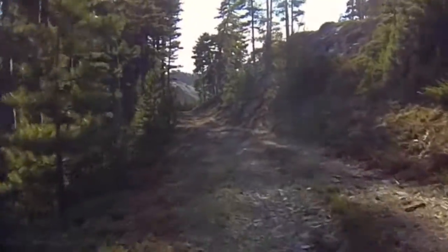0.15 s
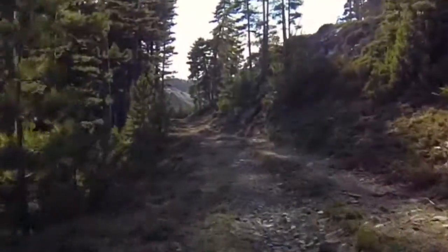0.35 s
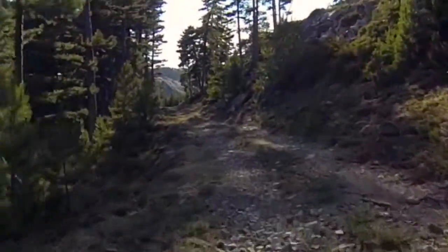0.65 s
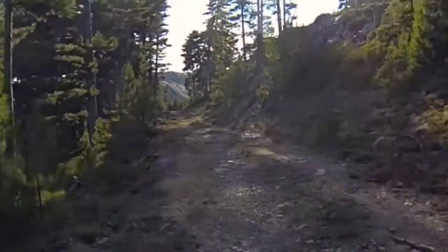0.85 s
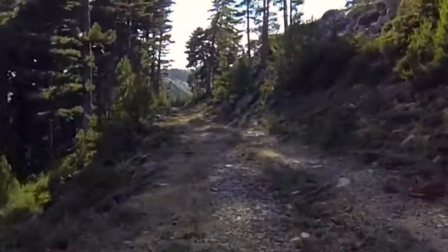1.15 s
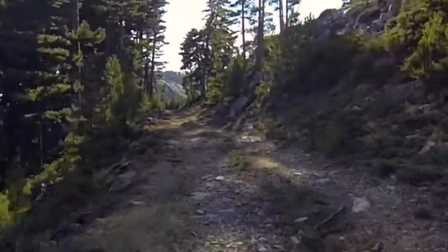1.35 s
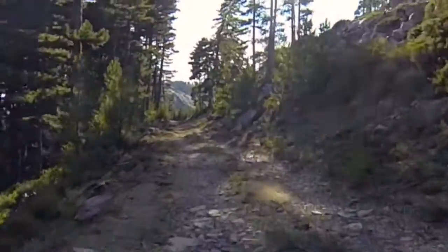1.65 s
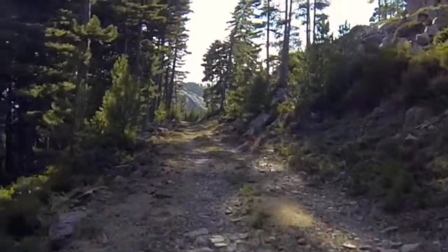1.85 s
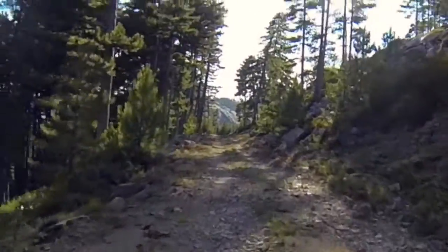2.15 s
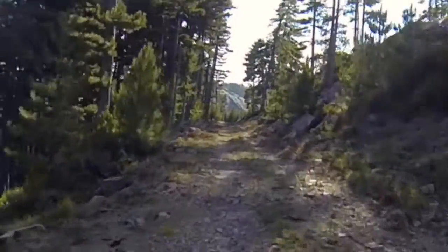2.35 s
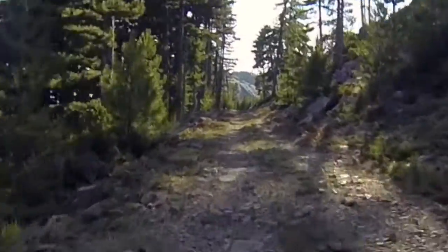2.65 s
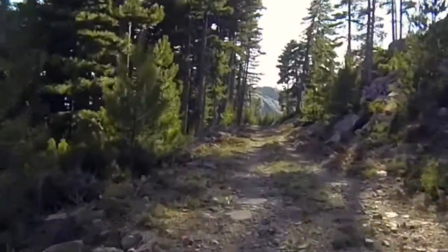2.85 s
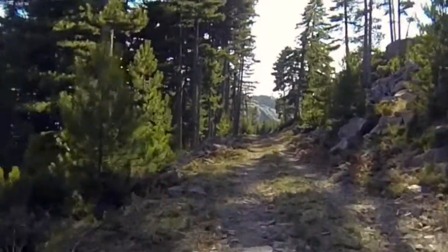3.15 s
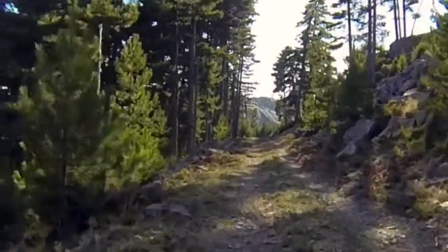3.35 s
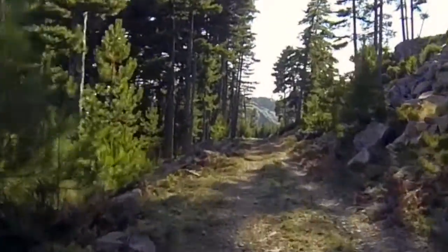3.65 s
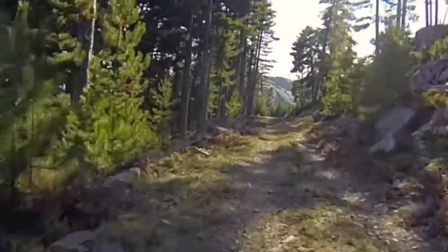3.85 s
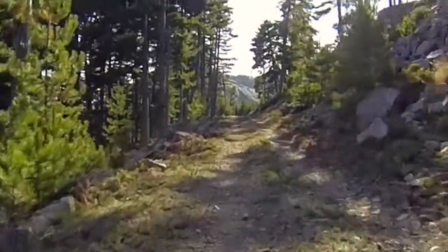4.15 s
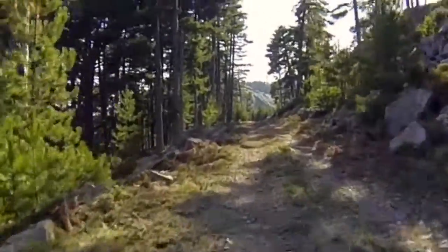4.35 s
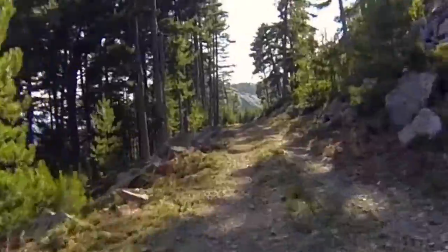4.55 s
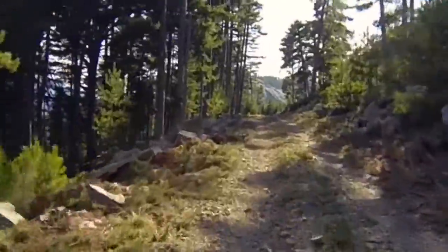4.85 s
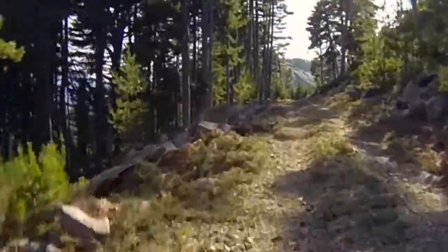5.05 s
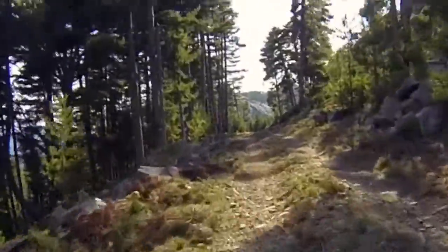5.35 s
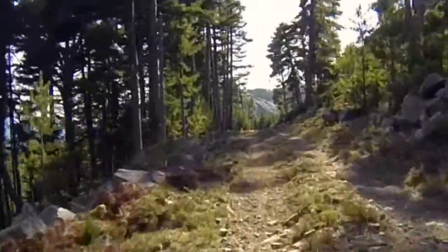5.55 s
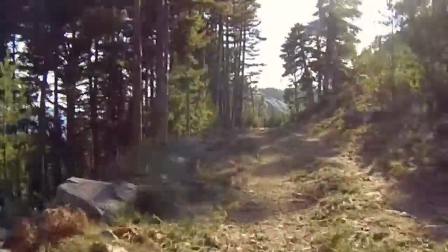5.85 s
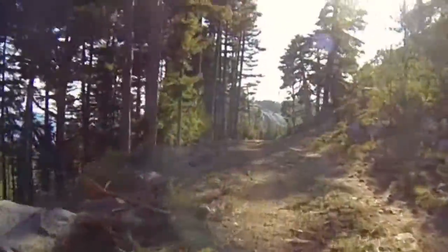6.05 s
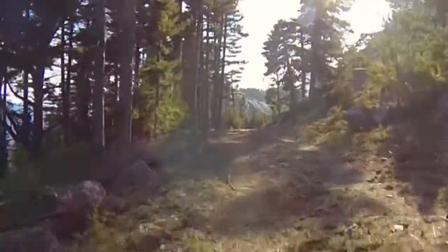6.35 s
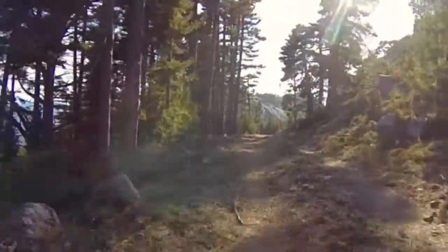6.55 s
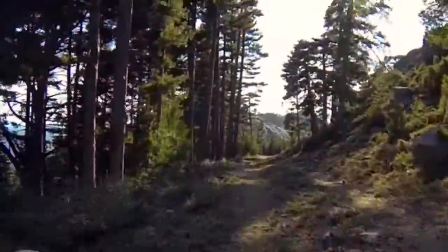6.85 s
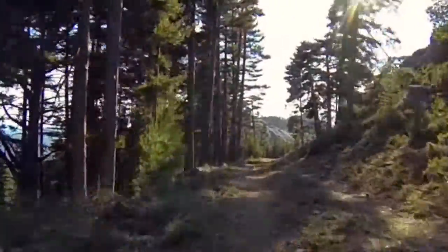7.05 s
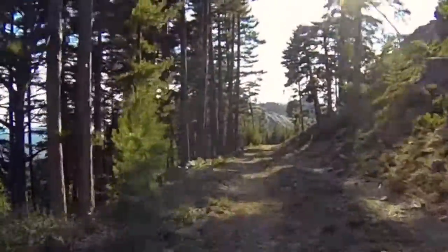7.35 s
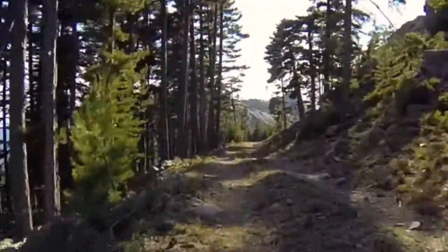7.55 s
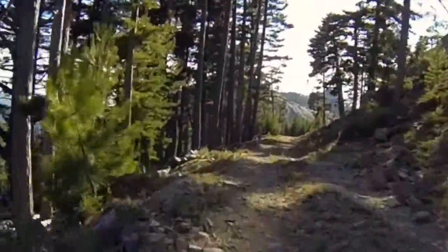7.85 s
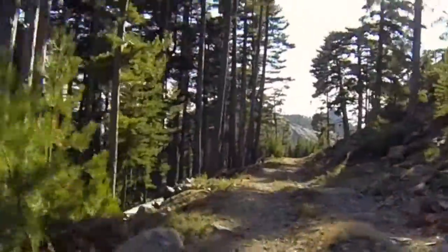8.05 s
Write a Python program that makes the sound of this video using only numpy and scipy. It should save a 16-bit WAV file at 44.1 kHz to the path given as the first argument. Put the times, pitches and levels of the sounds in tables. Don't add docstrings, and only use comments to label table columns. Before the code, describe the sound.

Close on a bike frame, tyres crunch loose stones amid deep wind rumble, boxy knocks and rattles, with flung stones pinging off the tubes.

```python
import sys
import numpy as np
from scipy import signal
from scipy.fft import rfft, irfft
from scipy.io import wavfile
from scipy.ndimage import uniform_filter1d, minimum_filter1d

SR = 44100
rng = np.random.default_rng(int(sys.argv[2]) if len(sys.argv) > 2 else 0)


def waveform_to_disk(signal):
    frames = np.transpose(np.atleast_2d(signal))
    scaled = np.clip(frames, -1, 1) * 32767
    samples = np.round(scaled).astype(np.int16)
    wavfile.write(sys.argv[1], SR, samples)


def invert_db(x):
    u = np.asarray(x, float) / 20
    return 10 ** u


N = 362040

# frequency in Hz, level in dB per Hz.
BOOM_SPECTRUM = [(7.1, -32), (12, -9), (38, -2.5), (54, 4), (67, -6), (86, -28), (110, -25), (140, -47),
                 (240, -120)]
# frequency in Hz, level in dB per Hz.
BUFFET_SPECTRUM = [(47, -36.5), (80, -3), (92, -3), (135, -4.5), (177, -10.5), (300, -17), (390, -39),
                   (660, -120)]
# time in seconds, boom level in dB.
GUST_CURVE = [(0, -13), (.22, -21.5), (.59, -8.5), (.77, -20.5), (.92, -14), (1.42, -17), (1.55, -10),
              (1.84, -18.5), (2.17, -12), (2.83, -21.5), (3.59, -13), (4.5, -15.5), (5.4, -13),
              (6.48, -13.5), (6.72, -20), (7.15, -5.5), (7.75, -14), (8.1, -13)]
# time in seconds, buffet level in dB.
WIND_CURVE = [(0, -29), (.2, -37), (.5, -25), (.76, -38), (1.0, -31.5), (1.44, -34), (2.05, -30.5),
              (2.4, -30.5), (2.8, -40), (3.3, -38), (3.8, -27.5), (4.5, -32), (5.5, -24.5), (6.1, -28),
              (6.6, -28.5), (7.2, -21.5), (7.75, -22.5), (8.21, -32.5)]
# time in seconds, level in dB.
HISS_CURVE = [(0.0, -23), (0.015, -59), (1.1, -54), (1.32, -72), (2.2, -68), (2.5, -59), (3.06, -71),
              (3.75, -72), (3.9, -48), (4.3, -56), (4.6, -67), (5.3, -69), (6.56, -60), (7.2, -51),
              (8.21, -60)]
# time in seconds, crunch level in dB.
GROUND_CURVE = [(0, -17.5), (.22, -23.5), (.92, -21.5), (1.42, -23.5), (2.15, -19), (2.3, -24), (2.6, -22),
                (2.93, -25.5), (3.4, -23.5), (3.72, -24), (4.0, -18.5), (4.35, -23.5), (5.46, -16),
                (6.0, -21), (6.7, -21), (7.15, -21), (7.72, -20.5), (8.21, -22)]
# frequency in Hz,
# level in dB per Hz.
WALL_SLOPE = [(150, -17), (280, -1.5), (600, -4), (1100, -4), (2200, -9), (3400, -16), (4500, -19.5),
              (6000, -28), (10000, -38), (14900, -48.5), (15500, -103)]
# centre in Hz, width in Hz, height in dB.
HOUSING_PEAKS = [(495, 75, 4), (770, 114, 6.5), (872, 41, 6), (985, 90, 6), (1133, 55, -5.5),
                 (1236, 57, 3.5), (1430, 79, 5.5), (1649, 82, -9.5), (1790, 610, 5), (3117, 96, 7.5),
                 (3530, 460, 3.5), (4810, 620, 4), (6340, 100, -2.5), (6640, 280, 3), (11200, 460, 8)]
SLICE_EDGES_HZ = (150, 420, 640, 1100, 1600, 2700, 4000, 6300, 9500, 16000)
# start in seconds, length in seconds, level in dB.
SKID_EVENTS = [
    (0.405, 0.039, -17.5),
    (1.011, 0.035, -16.5),
    (1.64, 0.036, -14.5),
    (2.42, 0.057, -18),
    (2.958, 0.034, -18),
    (7.922, 0.035, -22.5),
]
# start in seconds, peak in dB, metal tick in dB.
CHAIN_SLAPS = [(0.083, -19, -36), (0.2504, -11, -39), (0.4896, -10, -44), (0.7371, -5.5, -35),
               (0.8228, -10.5, -50), (0.9427, -8.5, -50), (1.2845, -12, -45), (1.6076, -10.5, -50),
               (2.2218, -9.5, -40), (2.514, -5.5, -48), (2.5845, -2.5, -32), (2.7205, -16, -41),
               (2.8725, -18, -42.5), (3.114, -15, -52), (3.1931, -16, -54), (3.3565, -14.5, -51),
               (3.424, -18, -44), (3.5853, -8.5, -45), (3.7328, -12, -39), (3.8552, -8.5, -40),
               (3.896, -12, -55), (3.976, -12.5, -56), (4.34, -13, -53), (4.4157, -5.5, -39),
               (4.4884, -9.5, -48), (4.9257, -11.5, -41), (5.2945, -9, -44), (5.5487, -8.5, -37),
               (5.8718, -20, -55), (6.343, -7.5, -44)]
# start in seconds, peak in dB, favoured pitch in Hz.
MOUNT_RATTLES = [(0.21, -12, 890), (0.406, -14, 824), (0.453, -3, 1440), (0.874, -4, 1240),
                 (1.045, -3.5, 1410), (1.102, -8, 791), (1.317, -6.5, 883), (1.404, -15, 848),
                 (1.504, -10.5, 907), (1.631, -8, 910), (1.738, -8.5, 470), (1.925, -8.5, 888),
                 (2.212, -5.5, 824), (2.81, -8, 1490), (3.531, -4.5, 1480), (3.954, -3.5, 1430),
                 (4.106, -13, 894), (4.238, -9, 970), (4.384, -5.5, 910), (4.841, -6.5, 522),
                 (5.016, -7, 886), (5.236, -17, 861), (5.379, -9, 1370), (5.99, -13, 770),
                 (6.145, -7.5, 755), (6.315, -10, 982), (6.479, -8.5, 929), (7.04, -17, 969),
                 (7.504, -14.5, 834), (7.968, -3.5, 837)]
# start in seconds, peak in dB, favoured pitch in Hz, bright part in dB.
STONE_KNOCKS = [(0.044, -11, 826, -29), (0.103, -1.5, 864, -41), (0.362, -4.5, 977, -35),
                (0.56, -10, 810, -34), (0.636, -3, 840, -23), (0.669, -1.5, 1240, -22),
                (1.129, -0.5, 495, -20), (1.698, -1.5, 890, -18.5), (2.047, -11.5, 977, -24),
                (2.124, 0.5, 840, -27), (2.391, -6.5, 896, -21), (2.418, -5, 1450, -12),
                (2.446, 3.5, 790, -19), (2.644, -1.5, 885, -17), (2.961, -9.5, 751, -14),
                (2.978, -2, 480, -17), (3.818, -5, 856, -24), (4.022, -1, 883, -28),
                (4.146, -8.5, 869, -26), (4.264, -5, 902, -31), (4.649, -5.5, 853, -19.5),
                (4.738, -5.5, 846, -29), (4.819, -5.5, 1360, -41), (4.988, -3, 1250, -25),
                (5.091, -9.5, 484, -10.5), (7.596, -12, 970, -32), (7.696, -9, 960, -38),
                (7.817, 0, 950, -23), (7.946, -1.5, 985, -28), (8.005, -3.5, 730, -28)]
# frequency in Hz, level in dB, t60 in seconds.
TUBE_MODES = [(2270, 5, 0.011), (1790, -1.5, 0.012), (1450, -15.5, 0.025), (2570, -19, 0.041),
              (3250, -40, 0.22), (3340, -5.5, 0.007), (3670, -46, 0.11), (4970, -58, .45), (5730, -59, .15),
              (6433, -77, 0.5), (6720, -88, 0.17)]
# start in seconds, peak in dB, bright part in dB, share of lasting ring
# in dB, broad knock in dB.
STONE_PINGS = [
    (5.6113, 2.5, -26, -19, 6),
    (5.7688, 0.5, -26, -13, 5),
    (6.7386, -3, -26, -10, 8),
    (6.8228, 4.5, -22, -13, 5),
    (5.7799, -10.5, -32, -16, 5.5),
]
# time in seconds, depth in dB.
GAIN_DROPS = [
    (2.99, 6.5),
    (5.615, 16),
    (6.745, 13.5),
    (6.828, 20.5),
]


def rms_one(x):
    return x / np.sqrt(np.mean(x ** 2) + 1e-20)


def in_time(rows):
    s, level_db = np.transpose(rows)
    return np.interp(np.arange(N) / SR, s, level_db)


def drift(rate_hz):
    r = np.exp(-2 * np.pi * rate_hz / SR)
    noise = rng.standard_normal(N + SR)
    return rms_one(signal.lfilter([1], [1, -2 * r, r * r], noise)[SR:])


def band(x, low_hz, high_hz):
    return signal.sosfilt(signal.butter(2, [low_hz, high_hz], "band", fs=SR, output="sos"), x)


def through(x, response):
    return signal.oaconvolve(x, response)[:N]


def causal(spectrum, peaks=(), size=8192):
    hz = np.maximum(np.arange(size // 2 + 1) * SR / size, 1)
    points = np.array(spectrum)
    level_db = np.interp(np.log(hz), np.log(points[:, 0]), points[:, 1])
    for centre_hz, width_hz, peak_db in peaks:
        level_db = level_db + peak_db / (1 + (2 * (hz - centre_hz) / width_hz) ** 2)
    cepstrum = irfft(np.log(invert_db(level_db)))[:size // 2]
    cepstrum[1:] *= 2
    response = irfft(np.exp(rfft(cepstrum, size)))
    return response / np.sqrt(np.sum(response ** 2))


def housing_parts():
    whole = causal(WALL_SLOPE, HOUSING_PEAKS)[:2048]
    parts = np.array([band(whole, low, high) for low, high in zip(SLICE_EDGES_HZ, SLICE_EDGES_HZ[1:])])
    bright = np.array(SLICE_EDGES_HZ[:-1]) >= 2700
    for group in (bright, ~bright):
        parts[group] /= np.sqrt(np.sum(parts[group] ** 2))
    return parts, bright


def grains(per_s, spread_db):
    sizes = invert_db(spread_db * np.minimum(rng.exponential(1, N), 5))
    sizes = sizes * rng.choice([-1, 1], N)
    return rms_one(sizes * (rng.random(N) < per_s / SR))


def taps(per_s, t60):
    struck = invert_db(3.3 * rng.standard_normal(N)) * (rng.random(N) < per_s / SR)
    t = np.arange(int(.04 * SR)) / SR
    return through(struck, (1 - np.exp(-t / 0.00074)) * invert_db(-60 * t / t60))


def flurry(t, rise_s, t60):
    shape = (1 - np.exp(-t / rise_s)) * invert_db(-60 * t / t60)
    burst = shape * rng.standard_normal(len(t)) * invert_db(6.3 * rng.standard_normal(len(t)))
    return burst * np.sqrt(np.sum(shape ** 2) / np.sum(burst ** 2))


def ducking():
    t, recovery_db_per_s = np.arange(N) / SR, 20
    drops = [(t >= s) * np.maximum(depth_db - recovery_db_per_s * (t - s), 0) for s, depth_db in GAIN_DROPS]
    return -np.max(drops, axis=0)


def wind(boom_db, buffet_db):
    boom = through(rng.standard_normal(N), causal(BOOM_SPECTRUM, [(51.2, 6.3, 1.4)], size=32768))
    boom = boom / np.sqrt(uniform_filter1d(boom ** 2, int(.12 * SR)) + 0.43)
    buffet = through(rng.standard_normal(N), causal(BUFFET_SPECTRUM, size=32768))
    buffet = buffet * invert_db(0.66 * drift(12))
    return invert_db(boom_db) * rms_one(boom) + invert_db(buffet_db - 1.0) * rms_one(buffet)


def hiss(parts, duck_db):
    air = through(rng.standard_normal(N), parts[-1] + invert_db(-8) * parts[-2])
    return invert_db(in_time(HISS_CURVE) + duck_db - 6.5) * rms_one(air)


def crunch(crunch_db, grit_db, rough_db, parts, bright):
    together = invert_db(2.0 * drift(41) + 2.7 * drift(140))
    tap_gain = invert_db(0.092 * rough_db)
    dull_taps, broad_taps, bright_taps = [tap_gain * taps(24, 0.02) for _ in range(3)]
    neighbours = [drift(46) for _ in range(len(parts) + 1)]
    crunch_gain, grit_gain = invert_db(crunch_db - 0.5), invert_db(grit_db)
    out = 0
    for k, part in enumerate(parts):
        favour = invert_db(1.3 * (neighbours[k] + neighbours[k + 1]))
        felt = broad_taps + (dull_taps if SLICE_EDGES_HZ[k] < 1600 else bright_taps)
        tap_db = 12.5 if bright[k] else 10
        clumps = favour * (together + invert_db(tap_db) * felt)
        gain = grit_gain if bright[k] else crunch_gain
        out = out + gain * through(rms_one(clumps * grains(5000, spread_db=2.5)), part)
    return out


def skids(parts):
    t = np.arange(N) / SR
    swell = np.zeros(N)
    for s, length_s, level_db in SKID_EVENTS:
        arch = np.sin(np.pi * np.clip((t - s) / length_s, 0, 1))
        swell += invert_db(level_db) * np.sqrt(np.clip(arch, 0, 1))
    colour = parts[3] + parts[4] + invert_db(-12.5) * parts[5] + invert_db(-16.5) * parts[6]
    return through(swell * grains(3000, spread_db=4.0), colour / np.sqrt(np.sum(colour ** 2)))


def ticks(parts):
    drive, t = np.zeros(N + SR), np.arange(int(.04 * SR)) / SR
    taps_db = [(s, tick_db) for s, _, tick_db in CHAIN_SLAPS]
    taps_db += [(s, peak_db + bright_db - 3.5) for s, peak_db, bright_db, *_ in STONE_PINGS]
    for s, peak_db in taps_db:
        drive[round(s * SR):][:len(t)] += invert_db(peak_db + 12.5) * flurry(t, 0.0003, 0.0075)
    top = parts[-2:].sum(0)
    return through(drive, top / np.sqrt(np.sum(top ** 2)))


def blows():
    knock_t60, rebound_s, rebound_db = .027, .021, -7
    knocks = [(s, db + 4.0, hz, bright_db, knock_t60) for s, db, hz, bright_db in STONE_KNOCKS]
    rebounds = [(s + rebound_s, db + rebound_db, hz, bright_db + 1, knock_t60)
                for s, db, hz, bright_db in STONE_KNOCKS]
    rattles = [(s, db + 2.5, hz, -24.5, 0.036) for s, db, hz in MOUNT_RATTLES]
    slaps = [(s, db + 7, 1860, -13.5, .016) for s, db, _ in CHAIN_SLAPS]
    return knocks + rebounds + rattles + slaps


def jolts(parts, bright):
    knock, scrape = np.zeros((2, N + SR))
    t = np.arange(int(.1 * SR)) / SR
    for s, peak_db, hz, bright_db, t60 in blows():
        at, t60 = round(s * SR), np.clip(t60, .012, .14)
        contacts = flurry(t, 0.00054, t60)
        contacts[40] -= 5
        favoured = signal.lfilter(*signal.iirpeak(hz, 1.8, fs=SR), contacts)
        favoured *= np.sqrt(SR / hz / 14)
        knock[at:at + len(t)] += invert_db(peak_db - 3.0) * (favoured + invert_db(-7.5) * contacts)
        scrape[at:at + len(t)] += invert_db(peak_db + bright_db + 2.0) * flurry(t, 0.00058, 0.73 * t60)
    return through(knock, parts[~bright].sum(0)) + through(scrape, parts[bright].sum(0))


def pings():
    out, t = np.zeros(N), np.arange(int(.4 * SR)) / SR
    for s, peak_db, bright_db, ring_db, knock_db in STONE_PINGS:
        phases = rng.uniform(0, 2 * np.pi, len(TUBE_MODES))
        strengths_db = rng.normal(0, 2, len(TUBE_MODES))
        ringing = 0
        for (hz, level_db, t60), phase, extra_db in zip(TUBE_MODES, phases, strengths_db):
            lasting_db = ring_db * (level_db < -21)
            fade = invert_db(level_db + extra_db + lasting_db - 60 * t / t60)
            ringing += fade * np.sin(2 * np.pi * hz * t + phase)
        knock = band(flurry(t, 0.0014, 0.015), 650, 2900)
        crack = band(flurry(t, 0.00034, 0.0034), 3500, 13500)
        body = (1 - np.exp(-t / .0004)) * ringing + invert_db(knock_db) * knock
        at = round(s * SR)
        out[at:at + len(t)] += invert_db(peak_db) * (body + invert_db(bright_db + 6.0) * crack)
    return out


def scene():
    gust_db, buffet_db, ground_db = in_time(GUST_CURVE), in_time(WIND_CURVE), in_time(GROUND_CURVE)
    duck_db = ducking()
    rough_db = ground_db - ground_db.mean()
    grit_db = -42.5 + 0.75 * rough_db
    parts, bright = housing_parts()
    air = wind(gust_db + duck_db, buffet_db + duck_db) + hiss(parts, duck_db)
    rolling = crunch(ground_db + duck_db, grit_db + duck_db, rough_db, parts, bright) + skids(parts)
    struck = ticks(parts) + jolts(parts, bright) + pings()
    return (air + rolling + struck)[None]


def band_limit(x):
    return signal.sosfilt(signal.butter(12, 15400, fs=SR, output="sos"), x)


def record(dry):
    room_left = minimum_filter1d(.95 / np.maximum(np.abs(dry), .95), size=129)
    held = dry * uniform_filter1d(room_left, size=129)
    return band_limit(held)


dry = scene()
out = record(dry)
waveform_to_disk(out)
```